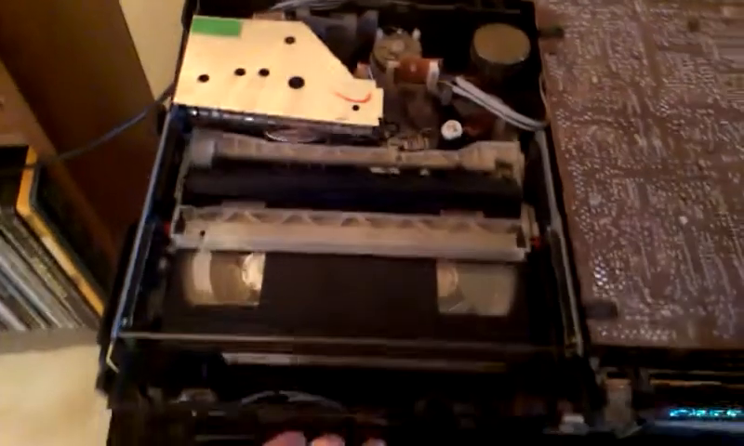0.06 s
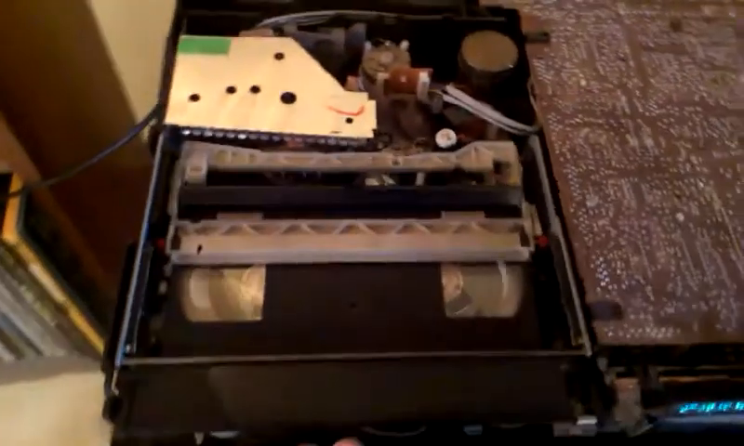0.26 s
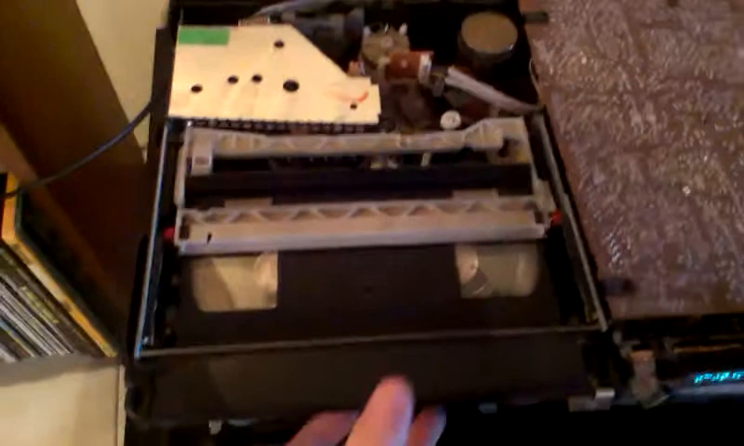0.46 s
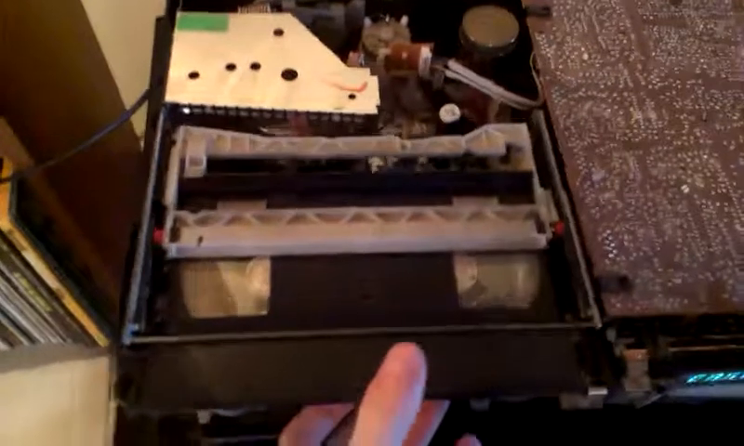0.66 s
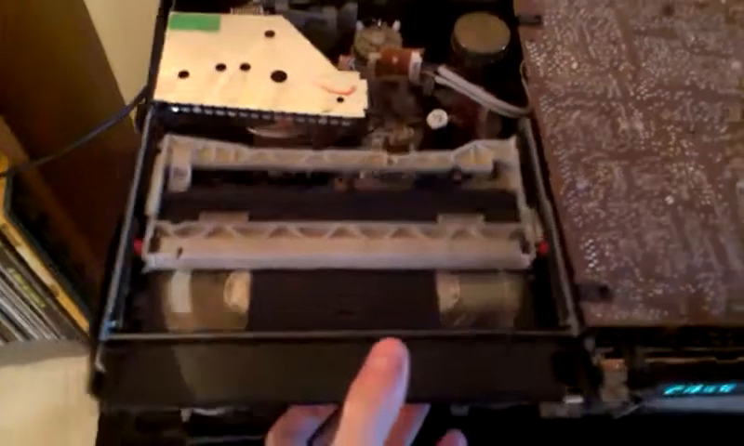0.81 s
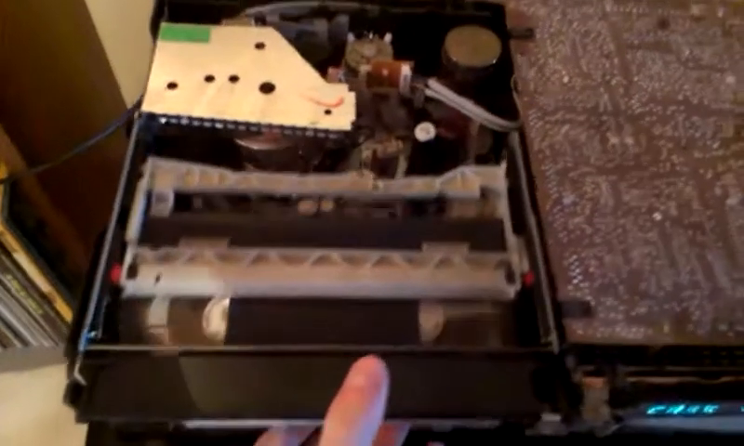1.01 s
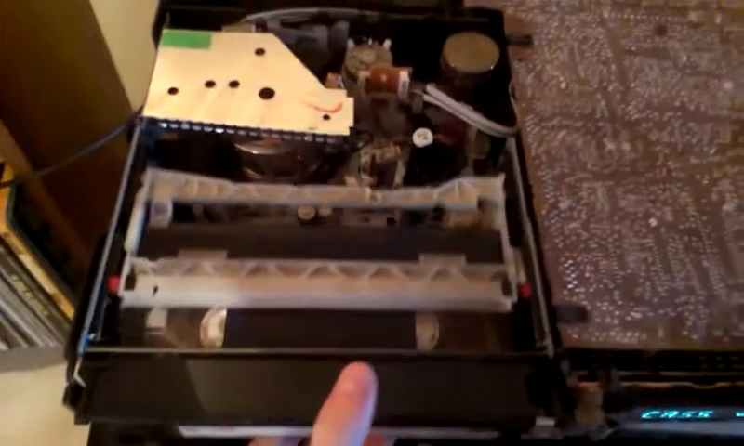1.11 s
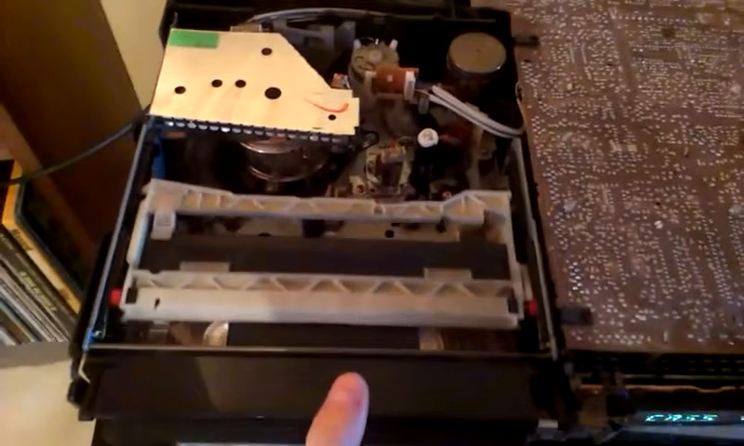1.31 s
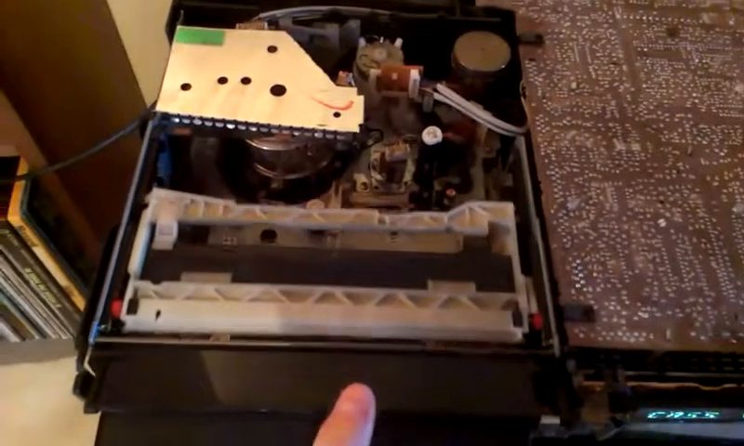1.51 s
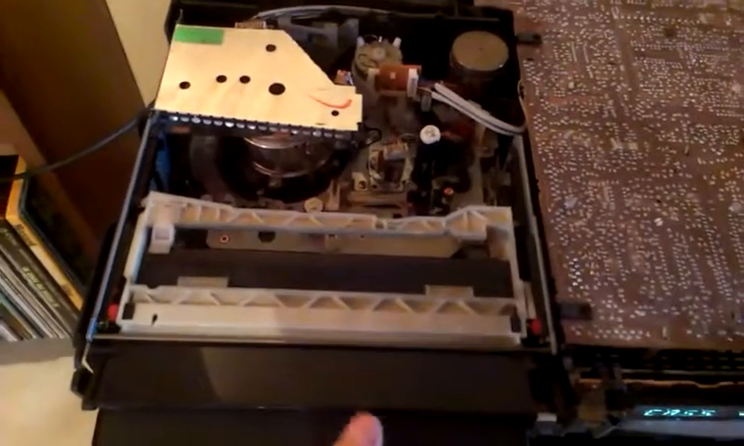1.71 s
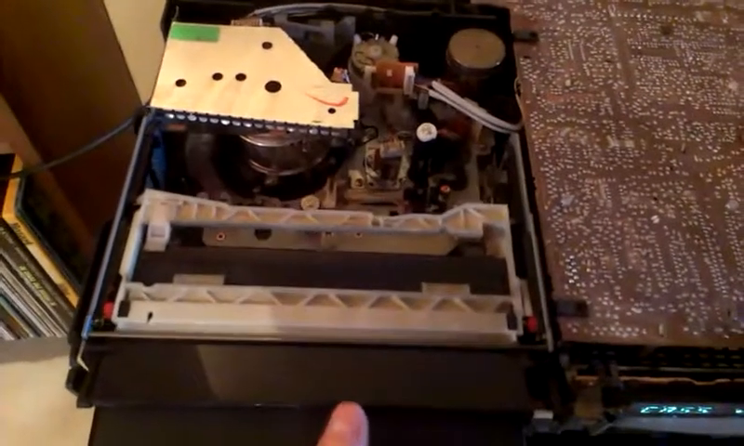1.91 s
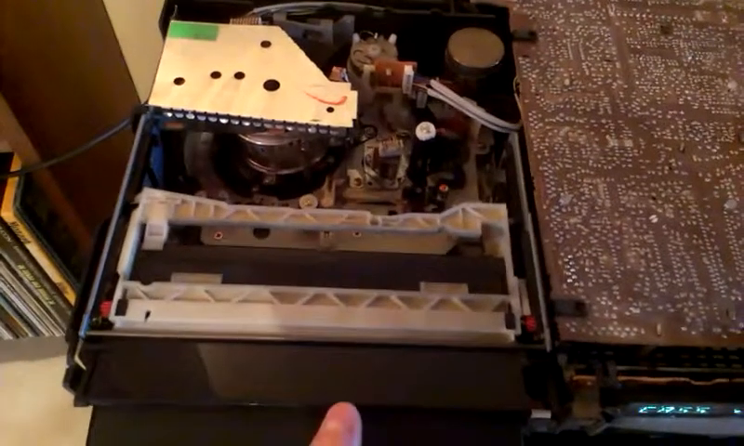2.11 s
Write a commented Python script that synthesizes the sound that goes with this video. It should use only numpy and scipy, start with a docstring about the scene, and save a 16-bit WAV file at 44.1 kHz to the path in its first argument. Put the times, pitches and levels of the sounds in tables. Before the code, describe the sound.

A video recorder's motor whirs and ticks, drawing in a cassette with a loud clack.

```python
"""A video recorder with its lid off draws in a cassette, close to the microphone in a small room.
Its small motor drones and whirs through plastic gears that tick once a turn and sometimes snag.
A spring pings; a sprung metal catch lets go with a loud clack that sets loose parts rattling.
The cassette carriage knocks as it goes down and seats, the motor stops, and a faint hiss remains."""
import sys
import numpy as np
from scipy import signal
from scipy.fft import rfft, irfft, next_fast_len
from scipy.io import wavfile
from scipy.ndimage import map_coordinates

SR = 44100
rng = np.random.default_rng(int(sys.argv[2]) if len(sys.argv) > 2 else 0)


def master(y):
    """Save y as 16-bit WAV."""
    cut = np.clip(np.atleast_2d(y).T, -1, 1)
    pcm = np.round(cut * 32767)  # scale
    wavfile.write(sys.argv[1], SR, pcm.astype(np.int16))


N = 94815


def amp(db):
    """Decibels to gain."""
    return 10 ** (np.asarray(db) / 20)


def unit(x):
    """Scale to rms 1."""
    return x / np.sqrt(np.mean(x ** 2) + 1e-20)


def decay(t, t60):
    """A fall of 60 dB every t60 seconds."""
    return np.exp(-np.log(1000) * t / t60)


def along(points, hz):
    """Read (freq_hz, value) points on a log axis."""
    freqs, values = np.transpose(points)
    return np.interp(np.log(hz + 1), np.log(freqs + 1), values)


def curve(rows):
    """One value per sample from (time_s, value) rows."""
    return np.interp(np.arange(N) / SR, *np.transpose(rows))


def wobble(per_s):
    """A smooth curve through per_s random knots a second."""
    knots = rng.standard_normal(int(N * per_s / SR) + 4)
    return map_coordinates(knots, [np.arange(N) * per_s / SR])


def coloured(x, colour, size=4096):
    """Pass x through a causal filter of unit energy, shaped by (freq_hz, gain_db) points."""
    gain = amp(along(colour, np.fft.rfftfreq(size, 1 / SR)))
    cepstrum = irfft(np.log(gain))
    cepstrum[1:size // 2] *= 2  # fold to minimum phase
    cepstrum[size // 2 + 1:] = 0
    impulse = irfft(np.exp(rfft(cepstrum)))
    return signal.fftconvolve(x, impulse / np.linalg.norm(impulse))[:len(x)]


def add(track, start_s, sound):
    """Mix a sound into the track."""
    part = track[max(0, round(start_s * SR)):][:len(sound)]
    part += sound[:len(part)]


def bursts(rows, t60):
    """Noise that jumps up at each (start_s, level_db) row and dies away."""
    envelope, t = np.zeros(N), np.arange(SR // 4) / SR
    for start_s, db in rows:
        add(envelope, start_s, amp(db) * decay(t, t60))
    return envelope * rng.standard_normal(N)


def dying_noise(t60s, size=128):
    """Noise in which each frequency dies at its own speed."""
    hz, t, spectrum = signal.stft(rng.standard_normal(SR // 2), SR, nperseg=size)
    return signal.istft(spectrum * decay(t, along(t60s, hz)[:, None]), SR, nperseg=size)[1]


def ring(modes, scatter_db, rough, attack_s):
    """One blow on a set of modes, starting near rms 1; rough makes their phases wander."""
    hz, db, t60 = np.transpose(modes)[:, :, None]
    t = np.arange(SR // 2) / SR
    gain = amp(db + scatter_db * rng.standard_normal(db.shape)) / np.linalg.norm(amp(db))
    drift = rough * np.cumsum(rng.standard_normal((len(hz), len(t))), axis=1) / np.sqrt(SR)
    phase = 2 * np.pi * (hz * t + rng.random(hz.shape)) + drift
    attack = 1 - np.exp(-t / attack_s)
    return np.sqrt(2) * attack * np.sum(gain * np.sin(phase) * decay(t, t60), axis=0)


def rubbing(turns, repeat_share=0.29, size=1400):
    """Tooth roughness: partly the same on every turn, partly new."""
    worn = map_coordinates(rng.standard_normal(size), [turns % 1 * size], mode="grid-wrap")
    return np.sqrt(repeat_share) * unit(worn) + np.sqrt(1 - repeat_share) * rng.standard_normal(N)


GEAR_TURNS = [(-.02, 0), (.046, 2), (.336, 11), (.506, 16), (.717, 22), (.86, 26), (.973, 29), (1.317, 40),
              (1.479, 45), (1.615, 49), (1.72, 49.95)]  # the gear's travel: time_s, position_turns
WHIR_LEVEL = [(0, -39.5), (.2, -42), (.42, -40.5), (.7, -44), (.92, -40), (1.05, -42.5), (1.3, -42.5),
              (1.55, -42), (1.628, -39.5), (1.655, -61), (1.71, -74)]  # the gears, close up: time_s, level_db
WHIR_COLOUR = [(880, -42), (1500, -11), (1740, -22), (1900, -3), (2070, -4), (2330, 1.5), (2720, -8.5),
               (2940, -12), (3510, -16.5), (4100, -15.5), (5290, -15.5), (5560, -7.5), (6820, -16),
               (7230, -19), (8710, -29.5), (13100, -30.5), (15500, -34.5)]  # teeth heard through the housing: freq_hz, gain_db
DRONE_LEVEL = [(0, -46.5), (.45, -51.5), (.7, -52), (.8, -45.5), (1.05, -49.5), (1.35, -48.5),
               (1.57, -50.5), (1.655, -50.5), (1.72, -97)]  # the motor, close up: time_s, level_db
DRONE_COLOUR = [(60, -35), (110, -15), (146, -3.5), (215, -10.5), (301, 2), (345, -7), (412, 0.5),
                (497, -6), (651, -7), (758, 6.5), (900, -1.5), (1020, 3), (1150, -3), (1360, 2), (1800, -6),
                (2340, -28), (4000, -62)]  # motor heard through the chassis: freq_hz, gain_db


def drive():
    """The motor drones into the chassis while the gears whir, throbbing three times a turn."""
    turns = curve(GEAR_TURNS)
    grain_db = 2.5 * wobble(per_s=300)
    throb_db = 1.5 * np.cos(2 * np.pi * 3 * turns)
    whir = unit(coloured(amp(grain_db + throb_db) * rubbing(turns), WHIR_COLOUR))
    drone = unit(coloured(rubbing(turns), DRONE_COLOUR))
    return amp(curve(WHIR_LEVEL)) * whir + amp(curve(DRONE_LEVEL)) * drone


HISS_COLOUR = [(20, 5.5), (70, -5), (150, -12.5), (450, -9.5), (850, -14.5), (1300, -5), (2100, -8),
               (3100, -14.5), (4400, -2.5), (5700, -2.5), (7500, -5), (9000, -17.5), (10500, -11),
               (13000, -19), (16000, -34)]  # noise floor at the microphone: freq_hz, gain_db


def hiss(level_db=-53):
    """A faint, steady hiss lies under the machine from the start."""
    return amp(level_db) * unit(coloured(rng.standard_normal(N), HISS_COLOUR))


TICK_LEVEL = [(0, -31.5), (.2, -40.5), (.34, -26.5), (.44, -29), (.473, -35), (.507, -31.5), (.72, -27.5),
              (.86, -39), (1.03, -31.5), (1.28, -29), (1.5, -30), (1.6, -36)]  # strength of the high tooth's tick: time_s, level_db
TICK_COLOUR = [(300, -14.5), (1500, -0.5), (3300, -10), (4400, -6), (6500, 0.5), (8500, -27.5),
               (13000, -23.5), (16000, -34)]  # its contact click: freq_hz, gain_db
GEAR_PITCH = [(.72, 2686), (1.05, 2386)]  # the gear rings lower once the carriage bears on it: time_s, pitch_hz


def gear_ticks(scatter_db=2, backlash_db=-5, backlash_hz=2280):
    """A high tooth clicks and rings the gear once a turn; just after, the gear falls back."""
    at = np.flatnonzero(np.diff(np.floor(curve(GEAR_TURNS))) > 0)
    chance = rng.standard_normal((len(at), 2))
    level_db = curve(TICK_LEVEL)[at] + scatter_db * chance[:, 0]
    backlash_s = 0.0105 + 0.0017 * chance[:, 1]
    t = np.arange(SR // 20) / SR
    contact = amp(-7) * rng.standard_normal(len(t)) * decay(t, t60=0.018)
    clicks, rings = np.zeros(N), np.zeros(N)
    for tick_s, db, hz, late_s in zip(at / SR, level_db, curve(GEAR_PITCH)[at], backlash_s):
        strike = (tick_s, amp(db), hz)
        fall_back = (tick_s + late_s, amp(db + backlash_db), backlash_hz)
        for start_s, gain, pitch_hz in strike, fall_back:
            tone = ring([(pitch_hz, 0, 0.02)], scatter_db=-1, rough=14.6, attack_s=0.00065)
            add(clicks, start_s, gain * contact)
            add(rings, start_s, gain * tone)
    return rings + coloured(clicks, TICK_COLOUR)


PINGS = [(.0235, -31.5), (.0505, -31), (1.1415, -29.5), (1.1705, -29), (1.2015, -27.5), (1.3166, -29.5)]  # ticks of the spring: start_s, level_db
PING_COLOUR = [(1000, -25), (2400, -0.5), (3500, -16), (5000, -10.5), (6500, -5.5), (7030, 0.5),
               (7600, -12), (9000, -33), (13200, -22), (16000, -35)]  # its bright resonances: freq_hz, gain_db


def spring_pings():
    """A spring gives a short, bright tick now and then."""
    return coloured(bursts(PINGS, t60=0.026), PING_COLOUR)


SNAGS = [(.111, -31), (.519, -30.5), (.7818, -31), (.791, -28), (.9055, -24), (.9085, -23), (1.0678, -24.5),
         (1.0805, -38), (1.0992, -27.5), (1.1115, -27.5), (1.2375, -25), (1.301, -25.5), (1.362, -32),
         (1.4587, -26.5)]  # teeth slipping free: start_s, level_db
SNAG_COLOUR = [(60, -31), (200, -29), (800, -12.5), (1700, -10.5), (2350, 3), (3500, -20.5), (5800, -12.5),
               (7500, -19), (9000, -39), (16000, -38)]  # their plastic snap: freq_hz, gain_db


def tooth_snags():
    """Gear teeth snag and slip with a dry snap."""
    return coloured(bursts(SNAGS, t60=0.018), SNAG_COLOUR)


CATCH_BLOWS = [(0.2328, -3, -13.5), (0.2436, -17.5, -9.5), (0.2494, -16.5, -15.5), (0.2744, -22.5, -30.5)]  # the strike and its rebounds: start_s, crack_db, ring_db
CRACK_COLOUR = [(30, -39), (100, -32), (170, -25.5), (301, -15.5), (550, -26.5), (1300, -12.5),
                (1820, -1.5), (2900, -9.5), (3600, 1.5), (4220, -5.5), (6000, -3.5), (7060, -4.5),
                (8320, -13.5), (10400, -1.5), (11400, -4), (12700, -18), (14900, -9), (16000, -27)]  # the crack at close range: freq_hz, gain_db
CRACK_DECAY = [(100, 0.28), (300, 0.23), (600, 0.18), (2000, 0.041), (5000, 0.083), (11000, 0.033),
               (16000, 0.029)]  # how long it lingers: freq_hz, t60_s
STEEL_MODES = [(304.7, -26.5, 0.32), (726, -18, 0.15), (1756, -10.5, 0.061), (1955, -13.5, 0.026),
               (3598, -5.5, 0.26), (3735, -15.5, 0.33), (4130, -19.5, 0.41), (4450, -11, 0.18),
               (4540, 0, 0.086), (4680, -17, .08), (5253, 4, 0.096), (5820, -2, 0.049), (5953, 4.5, 0.044),
               (6050, -3.5, 0.15)]  # the catch and its steel frame: pitch_hz, gain_db, t60_s


def catch(push_s=0.00035, push_db=6):
    """The catch snaps over with a blunt push and a crack, rebounds and rings the steel frame."""
    crack, steel = np.zeros(N), np.zeros(N)
    t = np.arange(SR // 100) / SR
    push = np.sin(np.pi * np.minimum(t / push_s, 1)) ** 2
    for start_s, crack_db, ring_db in CATCH_BLOWS:
        add(crack, start_s, amp(crack_db) * dying_noise(CRACK_DECAY))
        add(crack, start_s, amp(crack_db + push_db) * push)
        clang = ring(STEEL_MODES, scatter_db=0.5, rough=14.3, attack_s=0.00017)
        add(steel, start_s, amp(ring_db) * clang)
    return coloured(crack, CRACK_COLOUR) + steel


RATTLE_COLOUR = [(800, -16.5), (3000, -13), (3600, -1), (4650, -4), (4900, -12), (6800, -8), (12000, -27)]  # loose plastic in the open machine: freq_hz, gain_db


def rattle(count=80, taps_per_s=260, first_db=-26, scatter_db=6.5):
    """Shaken by the catch, loose plastic parts chatter in dense, fading taps."""
    after_s = np.cumsum(rng.exponential(1, count)) / taps_per_s
    fade_db = 20 * np.log10(decay(after_s, t60=0.7))
    level_db = first_db + fade_db + scatter_db * rng.standard_normal(count)
    taps = zip(CATCH_BLOWS[0][0] + after_s, level_db)
    return coloured(bursts(taps, t60=0.0073), RATTLE_COLOUR)


KNOCKS = [(0.7383, -30, -23.5), (0.7489, -29, -25), (.7555, -33, -50), (0.906, -40, -45),
          (1.595, -39.5, -37.5), (1.605, -38, -46), (1.651, -44.5, -56), (2.036, -54.5, -47.5)]  # the carriage meets its guides and seats: start_s, thud_db, click_db
CARRIAGE_MODES = [(423.7, -5, 0.12), (471, -5.5, 0.088), (542, -7.5, 0.15), (722, -1, 0.073),
                  (1015, 4, 0.086), (1163, -2, 0.083), (1355, -1, 0.053), (1624, -3.5, 0.082)]  # its hollow body: pitch_hz, gain_db, t60_s
CLICK_COLOUR = [(60, -47), (250, -28), (444, -12), (1060, -11.5), (1760, -4.5), (2360, -3), (3060, -8),
                (3500, -13.5), (5350, -11.5), (5730, 4.5), (6200, -13), (6750, -2.5), (7300, -18),
                (10700, -19), (16000, -36)]  # its plastic click: freq_hz, gain_db


def carriage(hard_knock_db=-32):
    """Each knock is a plastic click over a hollow thud; the softer the knock, the deeper the thud."""
    thuds = np.zeros(N)
    lowest_hz = CARRIAGE_MODES[0][0]
    for start_s, thud_db, _ in KNOCKS:
        db_per_octave = 0.25 * (thud_db - hard_knock_db)
        modes = [(hz, db + db_per_octave * np.log2(hz / lowest_hz), t60)
                 for hz, db, t60 in CARRIAGE_MODES]
        add(thuds, start_s, amp(thud_db) * ring(modes, scatter_db=1, rough=4.7, attack_s=0.0012))
    clicks = bursts([(start_s, click_db) for start_s, _, click_db in KNOCKS], t60=0.043)
    return thuds + coloured(clicks, CLICK_COLOUR)


SHUDDER_COLOUR = [(40, -11), (90, 0), (180, -2), (400, -3), (1000, -33)]  # low thump of the halting motor: freq_hz, gain_db


def motor_stop(start_s=1.652, level_db=-47.5):
    """The motor halts with a dull shudder."""
    return coloured(bursts([(start_s, level_db)], t60=0.11), SHUDDER_COLOUR)


ROOM_DECAY = [(150, 0.42), (1000, 0.34), (4000, 0.37), (10000, 0.23), (16000, 0.16)]  # reverberation of the small room: freq_hz, t60_s


def scene(room_db=-11.5):
    """From close by, the mechanism stands well above the room's short answer and the hiss."""
    direct = drive() + motor_stop() + gear_ticks() + tooth_snags() + spring_pings()
    direct += catch() + rattle() + carriage()
    tail = dying_noise(ROOM_DECAY)
    room = signal.fftconvolve(direct, tail / np.linalg.norm(tail))[:N]
    return (direct + amp(room_db) * room + hiss())[None]


def record(dry):
    """One close microphone rounds off the loudest peaks and keeps nothing above its band limit."""
    ceiling, top_hz = 0.58, 15900
    rounded = dry / (1 + np.abs(dry / ceiling) ** 6) ** (1 / 6)
    size = next_fast_len(N + SR // 2)
    in_band = np.fft.rfftfreq(size, 1 / SR) < top_hz
    return irfft(rfft(rounded, size) * in_band, size)[:, :N]


dry = scene()
out = record(dry)
master(out)
```